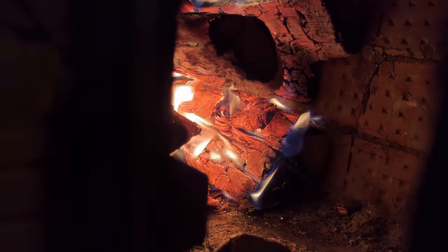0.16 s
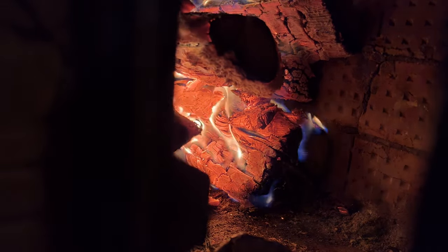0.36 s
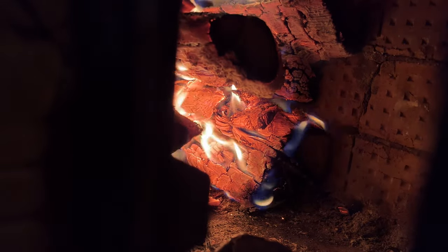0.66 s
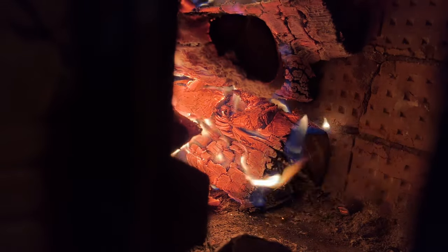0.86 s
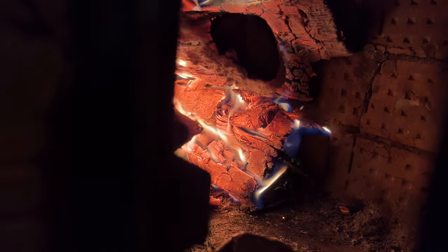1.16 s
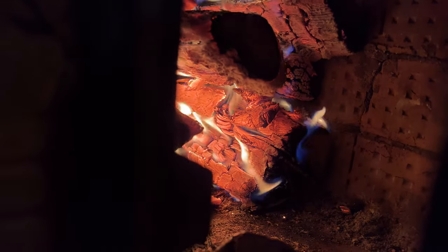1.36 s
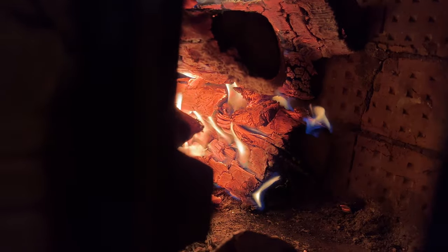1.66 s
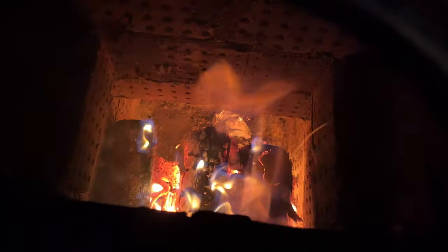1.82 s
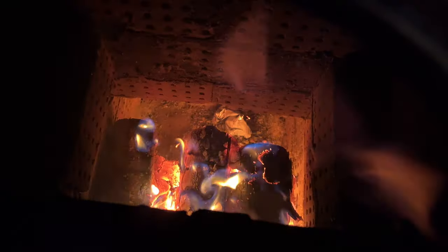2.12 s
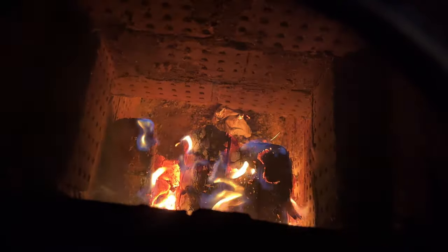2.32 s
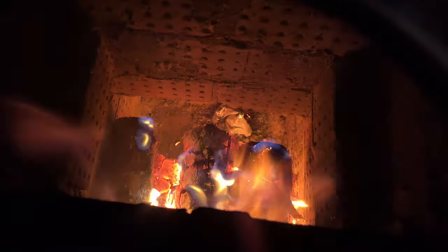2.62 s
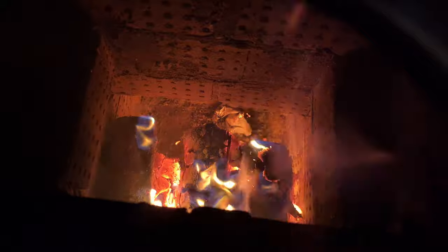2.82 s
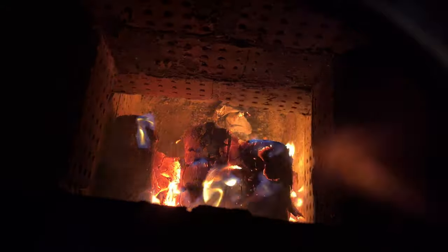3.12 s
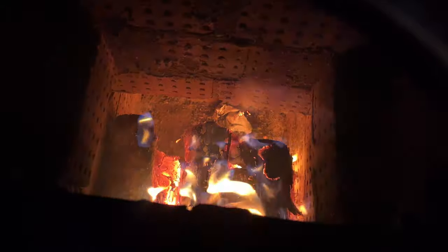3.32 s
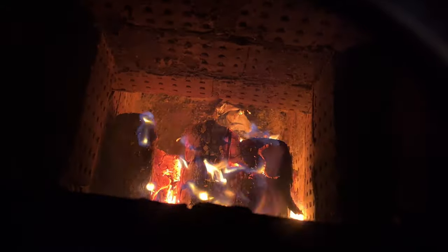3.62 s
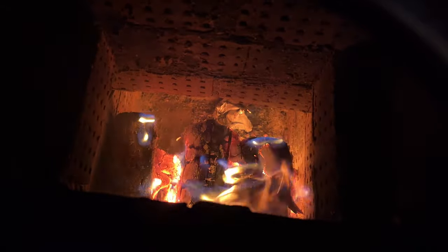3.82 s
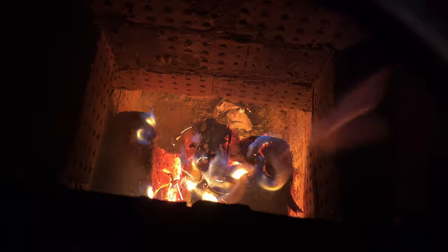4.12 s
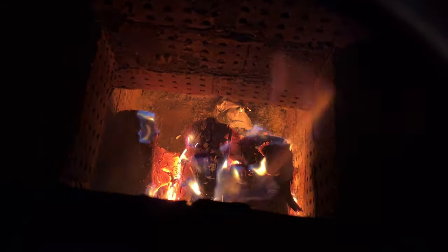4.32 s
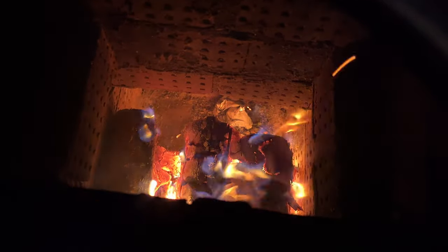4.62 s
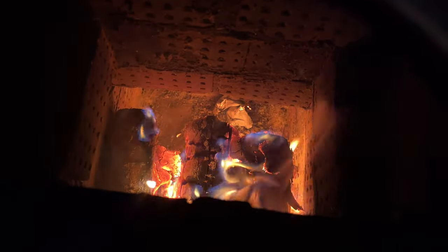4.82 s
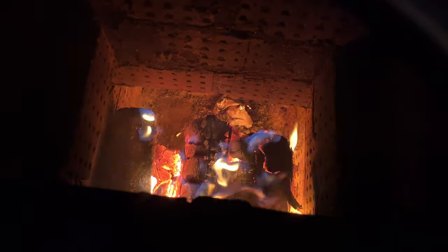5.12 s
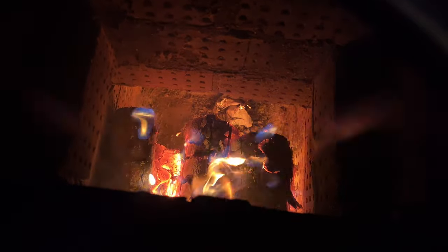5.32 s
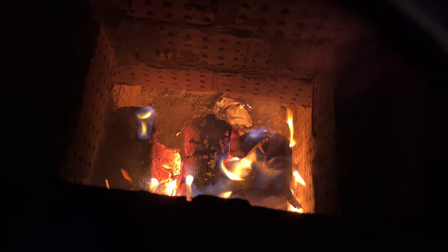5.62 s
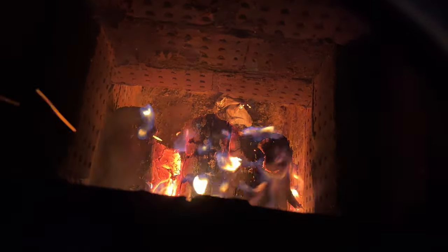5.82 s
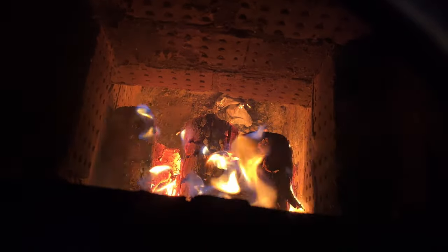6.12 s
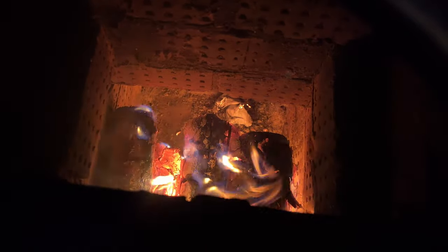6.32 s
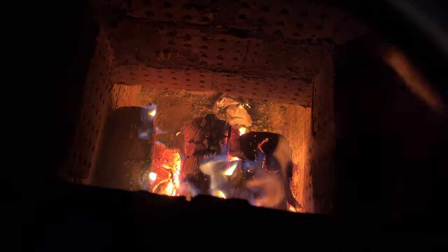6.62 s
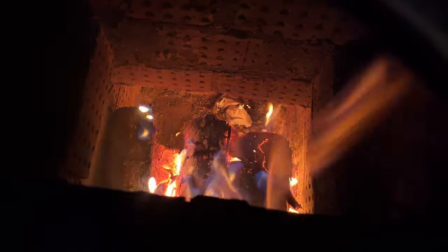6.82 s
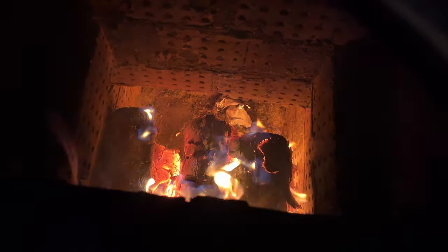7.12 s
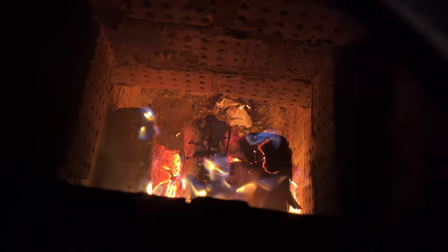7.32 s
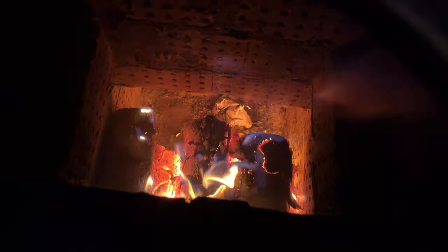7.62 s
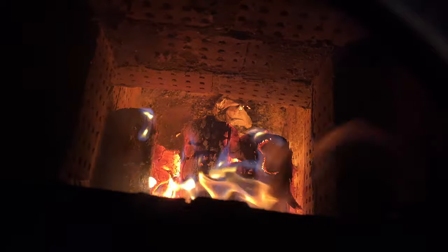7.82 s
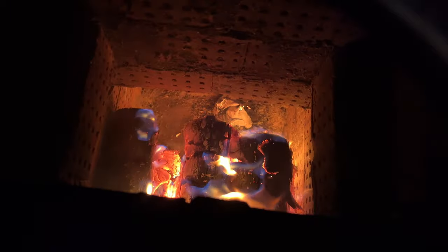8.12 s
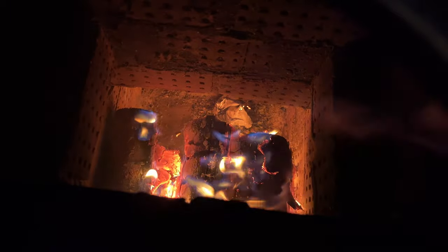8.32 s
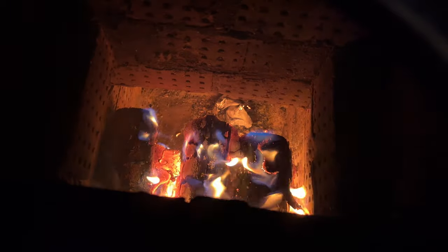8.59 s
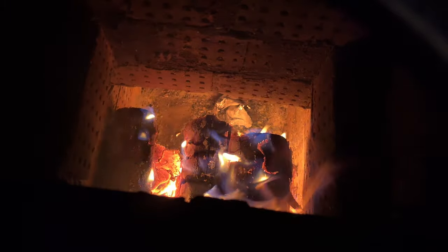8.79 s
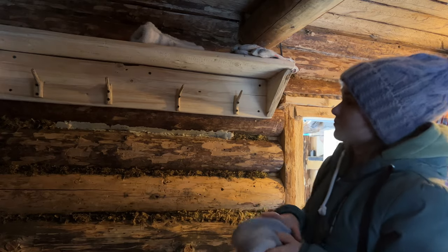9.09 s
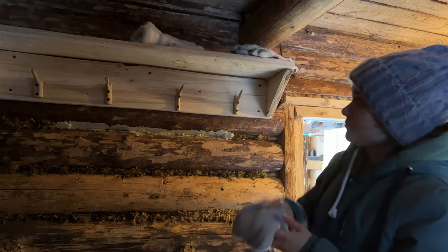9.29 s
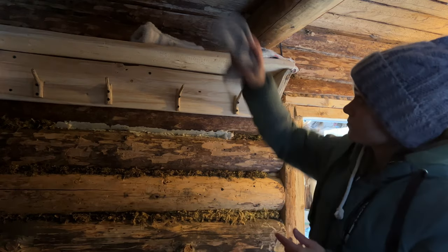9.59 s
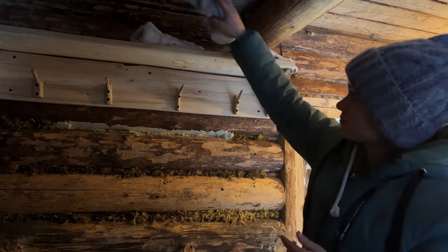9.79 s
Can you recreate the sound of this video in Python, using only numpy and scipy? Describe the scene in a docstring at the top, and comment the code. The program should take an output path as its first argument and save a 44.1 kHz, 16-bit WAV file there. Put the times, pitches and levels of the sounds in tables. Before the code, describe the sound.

A wood fire is heard very close, with dense dry crackling, fine sizzling and a low fluttering roar. After about two seconds the microphone is at the stove mouth, where flames puff deeper and louder, ticks are lighter, and occasional knocking pops punch through. At the end the fire vanishes into a hushed wooden room with one low thud and a sleeve swishing as an arm reaches up.

```python
"""An open brick stove, the microphone close to the embers, then at the stove mouth; last, a quiet log cabin.
At the stove, shaped noise makes flames that roar and flutter and sap that sizzles; pulses and damped
sines make wood that ticks, cracks and pops; fizzing noise jets out and the flue swells once.
In the cabin, cloth noise rustles as a jacketed arm reaches up to a shelf, and one dull knock rings
the timber as damped sines over a noise scuff and thud."""
import sys
import numpy as np
from scipy import signal
from scipy.fft import rfft, irfft, next_fast_len
from scipy.io import wavfile
from scipy.ndimage import uniform_filter1d, map_coordinates

SR = 44100
rng = np.random.default_rng(int(sys.argv[2]) if len(sys.argv) > 2 else 0)


def master_out(mix):
    """Clip the mix to full scale and print it as 16-bit PCM to the path in sys.argv[1]."""
    frames = np.transpose(np.atleast_2d(mix))
    ceiling = np.clip(frames, -1, 1)
    pcm = np.round(ceiling * 32767).astype(np.int16)
    wavfile.write(sys.argv[1], SR, pcm)


N = 438794

# steady burn under the puffs, starved for a while after the deepest pop: t/s, rumble level/dB, flutter level/dB
DRAUGHT = [(0.0, -24.5, -41), (0.6, -24.5, -38.5), (1.0, -28, -41.5), (1.85, -26, -40), (2.4, -24, -43.5),
           (3.9, -26.5, -39.5), (4.08, -31.5, -49), (4.55, -25.5, -41), (4.88, -31, -36), (5.42, -28, -49),
           (5.8, -23, -39.5), (6.68, -27.5, -46), (7.2, -24.5, -40.5), (8.2, -27.5, -43),
           (8.86, -24, -44.5)]
# tongues of flame flaring up: t/s, rumble level/dB
PUFFS = [(0.5, -19), (0.78, -23), (1.11, -21), (1.43, -20), (1.92, -32), (2.02, -18), (2.298, -14),
         (2.528, -18), (2.641, -19), (2.818, -16.5), (3.038, -14), (3.13, -23.5), (3.23, -18), (3.369, -16),
         (3.609, -20), (3.74, -22), (3.94, -12.5), (4.582, -24.5), (5.041, -21.5), (5.132, -18.5),
         (5.38, -24), (5.709, -19), (5.851, -17), (6.192, -13), (6.431, -20.5), (6.53, -19), (6.892, -15),
         (6.99, -18.5), (7.25, -22.5), (7.412, -21), (7.521, -15.5), (7.69, -24), (7.851, -17), (7.97, -18),
         (8.062, -18.5), (8.37, -21), (8.489, -18), (8.628, -22.5), (8.841, -15)]
# spectrum of the firebox rumble: f/Hz, relative level/dB
RUMBLE_SPECTRUM = [(13, -34.5), (22, -29), (60, -4), (86, 1.5), (106, -4), (135, -17), (220, -29),
                   (290, -32), (480, -120)]
# spectrum of the flame flutter, close to the embers: f/Hz, relative level/dB
EMBER_FLUTTER_SPECTRUM = [(100, -37.5), (170, -8.5), (240, -8), (325, 5), (400, 0), (520, -8), (630, -8),
                          (730, -24), (900, -18), (1200, -40.5), (2600, -81.5)]
# the same from the stove mouth: f/Hz, relative level/dB
MOUTH_FLUTTER_SPECTRUM = [(100, -35.5), (170, 0.5), (245, -12.5), (315, 0), (400, -4), (470, -9.5),
                          (540, -18), (620, -30), (800, -41.5), (910, -32.5), (1050, -41.5), (1400, -41),
                          (2200, -54.5), (4000, -90)]
# sap boiling out of the logs: t/s, relative level/dB
SAP = [(0.0, -54.5), (0.9, -55), (1.35, -55.5), (1.85, -56), (1.95, -74), (3.1, -67), (3.9, -65.5),
       (4.3, -74.5), (4.83, -65), (5.25, -71), (7.0, -67), (8.25, -73), (8.85, -65)]
# spectrum of the sizzle: f/Hz, relative level/dB
SIZZLE_SPECTRUM = [(400, -21.5), (650, 9.5), (1000, -1), (1800, -3), (3000, -3), (5500, -3.5), (6600, -4),
                   (7500, -1), (11000, 2.5), (12800, -14), (15000, 6), (16500, -9)]
# wood splitting, thin splits bright and deep ones dull: t/s, splinter level/dB, brightness/dB, splinter f/Hz
CRACKS = [(0.087, -37.5, 7, 3000), (0.173, -22.5, 1.5, 3120), (0.1964, -38, 3, 5500),
          (0.2468, -39, 1, 3300), (0.313, -42, 17.5, 4150), (0.3477, -29, 5.5, 3940),
          (0.4068, -31.5, -6.5, 2720), (0.5885, -49.5, 13.5, 4600), (0.6129, -35, -3, 3180),
          (0.7392, -32, -11, 2970), (0.7616, -40, 12.5, 4800), (0.8771, -32, -18.5, 4050),
          (0.912, -19, 2.5, 1990), (0.9633, -26, 3.5, 4200), (0.9784, -25, -3, 2860),
          (0.9849, -27.5, -0.5, 3760), (1.0916, -21, -3, 2610), (1.1692, -36, -6.5, 4300),
          (1.1997, -37, -2, 3360), (1.354, -41, 5.5, 4930), (1.3886, -37, 7.5, 4200),
          (1.412, -34, -12.5, 2460), (1.5854, -30, -5, 2940), (1.612, -35, 4.5, 5400),
          (1.6276, -17, -1.5, 4700), (1.656, -31.5, -3.5, 2600), (1.791, -16.5, -6, 4300),
          (1.9265, -39, 7, 5530), (1.9838, -37.5, 4, 3070), (2.038, -31.5, -1.5, 3300),
          (2.2517, -58.5, 19.5, 5500), (2.4943, -37.5, 8.5, 4950), (2.631, -53.5, 1, 1850),
          (2.7292, -42.5, 6.5, 3530), (2.8786, -52.5, -3.5, 3120), (3.0031, -34.5, 9, 5500),
          (3.2185, -46, 6.5, 4500), (3.4101, -41.5, 9.5, 5500), (3.5452, -49.5, 5.5, 4930),
          (3.7459, -29, 11.5, 5230), (3.833, -48.5, -0.5, 5270), (3.9145, -25, 7, 5420),
          (4.2002, -53.5, 4, 2300), (4.303, -45, 4.5, 5430), (4.7177, -43.5, -5.5, 1820),
          (4.8205, -40, 4.5, 5150), (4.8968, -49, 9.5, 3340), (4.978, -26, 0.5, 3880),
          (5.2741, -20, -1.5, 3370), (5.4923, -52, -4.5, 1900), (5.5721, -24, 5, 5600),
          (5.9316, -54.5, 13.5, 4830), (6.2458, -43.5, -1.5, 1970), (6.3307, -61.5, 18, 5130),
          (6.7343, -50.5, 9.5, 3550), (6.7892, -42, 0.5, 3330), (6.93, -46.5, 12, 3300),
          (6.9338, -36, 0, 3330), (7.0323, -49, -10, 1990), (7.126, -44, 2, 3350), (7.1934, -46, 3.5, 3270),
          (7.2558, -50, -1, 3100), (7.29, -50.5, 11, 5470), (7.3147, -43, 9.5, 5700),
          (7.4196, -50, 2.5, 3140), (7.713, -44.5, 6.5, 5400), (7.734, -44, 3, 3600),
          (7.7523, -43.5, 10.5, 5650), (7.885, -46, 4.5, 1900), (8.0145, -37.5, 6, 3450),
          (8.14, -43, 4.5, 3700), (8.4323, -42.5, 6.5, 3340), (8.813, -32, 1.5, 2970)]
# firebox modes ringing after a split: f/Hz, level over the log/dB, t60/s
FIREBOX_MODES = [(900, -16, .09), (1107, -25, 0.099), (1370, -13, 0.062), (2170, -17, .08),
                 (2880, -21, .08), (4700, -23.5, .08)]
# decay of the echo off the bricks: f/Hz, t60/s
BRICK_DECAY = [(500, 0.13), (3000, 0.13), (7000, 0.12), (14000, 0.082)]
# colour of the splits at the microphone: f/Hz, gain/dB
SNAP_COLOUR = [(4200, -0.5), (5300, -3.5), (6500, -0.5), (8000, 2.5), (11000, 1), (12900, -9), (15000, 3),
               (16300, 5)]
# heavy pops and gas pockets catching: t/s, knock relative level/dB, knock f/Hz, overtone f/Hz,
# boom level/dB, boom f/Hz
THUMPS = [(.877, -14.5, 730, 1150, -23, 88), (1.414, -12.5, 522, 900, -40, 89),
          (1.792, -17.5, 650, 987, -35, 91), (3.004, -11, 341, 985, -29, 96),
          (3.913, -6, 377, 720, -2.5, 57), (3.981, -16, 241, 551, -47, 82),
          (4.978, -16.5, 426, 1380, -27.5, 86), (5.2737, 0.5, 403, 1220, -9.5, 99),
          (5.571, -9, 397, 1370, -55.5, 89), (6.178, -37.5, 343, 900, -22, 96),
          (8.813, -20, 318, 640, -9, 88)]
# pockets of sap venting: t/s, length/s, level/dB, centre f/Hz
JETS = [(3.007, .12, -53, 9500), (3.007, 0.35, -61.5, 5040), (3.902, 0.077, -39.5, 5040),
        (7.692, 0.44, -59, 1380), (7.697, 0.53, -61.5, 6000)]
# lean of the stove sound, left minus right: f/Hz, level/dB
STOVE_TILT = [(60, 0), (350, 0), (700, 3), (1250, 7.5), (2000, 0), (3400, 3), (5500, 1.5), (8000, -.5)]
# lead of the left microphone port over the right at the stove: f/Hz, phase/rad
STOVE_LEAD = [(300, 0), (950, 0.57), (1900, 1.45), (2900, 1.13), (3500, 0.86), (4700, 0.9), (5700, -1.5),
              (8100, -7), (10000, -6), (11900, -8.5), (13650, -14), (15200, -9.5)]
# left-right likeness of the stove noises: f/Hz, coherence
STOVE_ALIKE = [(100, .99), (350, 0.88), (800, 0.67), (3000, 0.18), (9000, 0.92)]
# strokes of a sleeve, with the scuff of the knock at 8.99 s:
# t of the peak/s, rise/s, fall/s, rub relative level/dB, swish relative level/dB
STROKES_AND_SCUFF = [(8.89, 0.071, 0.14, -39, -46), (8.99, 0.013, 0.043, -25, -42),
                     (9.195, 0.084, 0.13, -33.5, -34.5), (9.55, 0.32, 0.21, -35, -38.5)]
# folds and fittings of the jacket flicking: t/s, starting level/dB, centre f/Hz
FLICKS = [(9.164, -29, 1560), (9.164, -31, 5700), (9.348, -32.5, 10000), (9.532, -29, 1380),
          (9.532, -29.5, 7000), (9.573, -22.5, 7760), (9.656, -43, 5700), (9.753, -43, 9100)]
# spectrum of the low rub: f/Hz, relative level/dB
RUB_SPECTRUM = [(76, -43), (130, -3), (330, -4.5), (392, 2.5), (427, -0.5), (493, -2), (676, -2.5),
                (1640, -5), (2190, -7), (4000, -12.5), (5200, -26), (8800, -120)]
# spectrum of the bright swish: f/Hz, relative level/dB
SWISH_SPECTRUM = [(1760, -44), (3000, -3.5), (5620, 2), (6810, -5), (8680, 0.5), (11300, -4.5),
                  (12300, -36), (15100, -2), (16200, -20), (16500, -39)]
# spectrum of the blow's grit: f/Hz, relative level/dB
KNOCK_SPECTRUM = [(180, -34), (300, 4), (441, -8), (769, -31), (940, 1), (1430, -5), (1800, -27),
                  (3490, -1.5), (7210, -29), (10300, -19), (12000, -46), (15600, -76), (22000, -120)]
# spectrum of the room's thud: f/Hz, relative level/dB
THUD_SPECTRUM = [(80, -18), (130, 10), (240, -5), (400, -4.5), (700, -16.0), (2000, -72)]
# modes of the knocked timber: f/Hz, level/dB, t60/s
TIMBER_MODES = [(67, -25, 0.5), (97, -9.5, 0.13), (151, -24, 0.1), (328, -42, 0.046)]
# spectrum of the cabin's room tone: f/Hz, relative level/dB
CABIN_SPECTRUM = [(13, -42), (22, -12), (64, 8.5), (253, -19.5), (338, -10), (395, -30), (433, -16),
                  (500, -23), (650, -36), (1100, -120)]
# lean of the cabin sound, left minus right: f/Hz, level/dB
CABIN_TILT = [(100, -4), (1300, -2.5), (2400, 0), (4400, 5), (8000, 0)]
# left-right likeness of the cabin noises: f/Hz, coherence
CABIN_ALIKE = [(60, 1), (200, .7), (700, 0.34), (3000, 0.81), (9000, .05)]

# changes of place (s), and the upper band limit
EMBERS_END, MOUTH_START, CABIN_START = 1.853, 1.869, 8.869
TOP_HZ = 16300
# a puff is 20 dB down this long before and after its peak; its flutter comes just ahead of its rumble
PUFF_RISE_S, PUFF_FALL_S, FLUTTER_LEAD_S = 0.047, 0.065, 0.009
# flutter of a puff relative to its rumble, and of a heavy pop relative to its tabled knock level
PUFF_FLUTTER_DB, POP_FLUTTER_DB, POP_FALL_S = -17.5, -18.5, 0.042
# flutter around this pitch gains so many dB per dB of strength over the usual level
FLUTTER_UPPER_HZ, FLUTTER_BRIGHTENS, USUAL_FLUTTER_DB = 526, 0.46, -39.5
# unevenness of boiling and flutter, dB per unit of a random curve
SAP_WAVER_DB, FLUTTER_WAVER_DB = 2.4, 1.8
# extra level of the log's band near the embers and at the mouth
EMBER_LOG_DB, MOUTH_LOG_DB = -10.5, -1.5
# light splits: mean number a second, level over the tabled sap, scatter either way, mean brightness
LIGHT_PER_S, LIGHT_OVER_SAP_DB, LIGHT_SPREAD_DB, LIGHT_BRIGHT_DB = 11, 6, 5.5, 7.5
# side modes of a splinter, different in each split: level, lowest pitch, range, decay
SIDE_MODES_DB, SIDE_MODES_HZ, SIDE_MODES_OCTAVES, SIDE_MODES_T60_S = -20, 1503, 2.9, 0.02
# the cloth never lies quite still: relative levels at rest
REST_RUB_DB, REST_SWISH_DB = -48, -55.5
# the left port hears the cabin this much later
CABIN_LAG_MS = 0.05


def amp(db):
    """Decibels to gain."""
    return 10 ** (np.asarray(db) / 20)


def unit(x):
    """Scale to rms 1."""
    return x / np.sqrt(np.mean(x ** 2) + 1e-20)


def clock(size=N):
    """Sample times in seconds."""
    return np.arange(size) / SR


def decay(t, t60):
    """Exponential decay that falls 60 dB in t60 seconds."""
    return np.exp(-np.log(1000) * t / t60)


def along(points, hz):
    """Read (Hz, value) points on a log frequency axis."""
    f, v = np.transpose(points)
    return np.interp(np.log(hz + 1), np.log(f + 1), v)


def curves(rows):
    """One value per sample for each column after the time."""
    s, *cols = np.transpose(rows)
    return [np.interp(clock(), s, c) for c in cols]


def filtered(x, response):
    """Filter x by a complex response of frequency."""
    size = x.shape[-1]
    padded = next_fast_len(size + 8192)
    spectrum = rfft(x, padded) * response(np.fft.rfftfreq(padded, 1 / SR))
    return irfft(spectrum, padded)[..., :size]


def band(x, lo_hz, hi_hz):
    """Causal band-pass."""
    edges = [lo_hz, min(hi_hz, SR / 2 - 1)]
    return signal.sosfilt(signal.butter(3, edges, "band", fs=SR, output="sos"), x)


def add(track, s, sound):
    """Mix a sound into a track at time s."""
    start = max(round(s * SR), 0)
    part = track[..., start:][..., :sound.shape[-1]]
    part += sound[..., :part.shape[-1]]


def wobble(rate):
    """A smooth random curve, rate knots a second."""
    knots = rng.standard_normal(int(N * rate / SR) + 4)
    return map_coordinates(knots, [np.arange(N) * rate / SR])


def noise(size=N):
    """Two unrelated white noises."""
    return rng.standard_normal((2, size))


def stereo(pair, spectrum, alike):
    """Colour two unrelated signals and blend them to left and right with a given coherence, rms 1."""
    def response(hz):
        turn = np.arccos(np.clip(along(alike, hz), -1, 1)) / 2
        return amp(along(spectrum, hz)) * [np.cos(turn), np.sin(turn)]

    mid, side = filtered(pair, response)
    return unit(np.array([mid + side, mid - side]))


def steady(x, span):
    """Even out swells slower than span seconds."""
    power = uniform_filter1d(np.mean(x ** 2, 0), int(span * SR))
    return x / np.sqrt(np.abs(power) + 1e-9)


def grains(rate, spread_db, t60):
    """Tiny noise bursts at random times, their sizes scattered exponentially in dB, rms 1."""
    starts = rng.random(N) < rate / SR
    sizes = starts * amp(spread_db * np.minimum(rng.exponential(size=N), 3))
    power = signal.fftconvolve(sizes ** 2, amp(-120 * clock(size=2048) / t60))[:N]
    return unit(np.sqrt(np.abs(power)) * noise())


def ring(t, hz, t60, attack):
    """A damped sine with a soft start."""
    return np.sin(2 * np.pi * hz * t) * decay(t, t60) * (1 - np.exp(-t / attack))


def placed(x, tilt, lead):
    """Lean to one side by frequency; the left port leads by lead(hz) radians."""
    sides = np.array([[.5], [-.5]])
    return filtered(x, lambda hz: amp(sides * along(tilt, hz)) * np.exp(1j * sides * lead(hz)))


def swell(s, rise, fall):
    """Start and power of a swell peaking at s, 20 dB down rise seconds before and fall seconds after."""
    t = np.arange(-2 * rise, 2 * fall, 1 / SR)
    return s + t[0], amp(-40 * np.abs(t / np.where(t < 0, rise, fall)) ** 1.5)


def swelling(base_db, swells):
    """Gain of a base level with (s, rise s, fall s, dB) swells added in power."""
    power = amp(base_db) ** 2 * np.ones(N)
    for s, rise, fall, db in swells:
        start, shape = swell(s, rise, fall)
        add(power, start, amp(db) ** 2 * shape)
    return np.sqrt(power)


def roar():
    """Flames pump the firebox's low resonance and flutter in its higher modes, brighter when strong."""
    rumble_db, flutter_db = curves(DRAUGHT)
    flares = [(s, PUFF_RISE_S, PUFF_FALL_S, db) for s, db in PUFFS]
    flaps = [(s - FLUTTER_LEAD_S, PUFF_RISE_S, PUFF_FALL_S, db + PUFF_FLUTTER_DB) for s, db in PUFFS]
    # heavy pops jolt the flames too
    jolts = [(s + 0.0046, .012, POP_FALL_S, knock_db + POP_FLUTTER_DB) for s, knock_db, *_ in THUMPS]

    rumble = steady(stereo(noise(), RUMBLE_SPECTRUM, STOVE_ALIKE), span=0.087)
    puffs = grains(rate=70, spread_db=2.5, t60=0.027) + amp(-3) * noise()
    near = stereo(puffs, EMBER_FLUTTER_SPECTRUM, STOVE_ALIKE)
    mouth = stereo(puffs, MOUTH_FLUTTER_SPECTRUM, STOVE_ALIKE)
    flutter = steady(np.where(clock() < EMBERS_END, near, mouth), span=0.11)
    upper = filtered(flutter, lambda hz: 1 / (1 + ((hz - FLUTTER_UPPER_HZ) / 110) ** 4))

    flicker = wobble(14)
    rumble_gain = swelling(rumble_db + 1.3 * flicker, flares)
    strength = swelling(flutter_db + FLUTTER_WAVER_DB * flicker, flaps + jolts)
    bright = np.minimum((strength / amp(USUAL_FLUTTER_DB)) ** FLUTTER_BRIGHTENS, 1.6)
    return rumble_gain * rumble + strength * (flutter + (bright - 1) * upper)


def sizzle():
    """Sap boils in a fine hiss; tiny ticks of charring wood stand out of it."""
    sap_db, = curves(SAP)
    hiss = noise() + amp(-12) * grains(rate=320, spread_db=7.5, t60=.002)
    hiss = stereo(hiss, SIZZLE_SPECTRUM, STOVE_ALIKE)
    ticks = stereo(grains(rate=50, spread_db=6, t60=.012), SIZZLE_SPECTRUM, STOVE_ALIKE)
    hiss_gain = amp(sap_db + 3.5 + SAP_WAVER_DB * wobble(21))
    return hiss_gain * hiss + amp(-8.5 + 0.83 * sap_db) * ticks


def light_splits():
    """Random rows like those of CRACKS for the light splits, stronger where more sap boils."""
    rows = rng.random((int(LIGHT_PER_S * CABIN_START), 4))
    s = CABIN_START * rows[:, 0]
    sap_db = np.interp(s, *np.transpose(SAP))
    db = sap_db + LIGHT_OVER_SAP_DB + LIGHT_SPREAD_DB * (2 * rows[:, 1] - 1)
    bright_db = LIGHT_BRIGHT_DB + 7 * (2 * rows[:, 2] - 1)
    return list(zip(s, db, bright_db, 2700 * 2 ** rows[:, 3]))


def brick_echo():
    """A new diffuse firebox tail, about energy 1 in each channel, decaying by frequency."""
    hz, t, z = signal.stft(noise(size=6144), SR, nperseg=128)
    tail = signal.istft(z * decay(t, along(BRICK_DECAY, hz)[:, None]), SR, nperseg=128)[1]
    return unit(tail) / np.sqrt(tail.shape[1])


def cracks():
    """A split is a sharp pulse, a ragged scatter among the logs, a brief ring of wood and a brick echo."""
    out, t = np.zeros((2, N)), clock(size=6144)
    for s, splinter_db, bright_db, splinter_hz in CRACKS + light_splits():
        near = s < EMBERS_END
        # brightness lifts the snap and lowers the log by as much
        snap_db = splinter_db + bright_db
        log_db = splinter_db - bright_db + (EMBER_LOG_DB if near else MOUTH_LOG_DB)
        ragged = amp(3.43 * unit(uniform_filter1d(rng.standard_normal(len(t)), size=90)))
        scatter = (rng.standard_normal(len(t)) + .5 * noise(size=len(t))) * ragged

        # the splinter rings at its own pitch and stirs a lower mode of the log
        splinter = ring(t, splinter_hz, t60=.007, attack=.0001)
        log = ring(t, 1000 * np.exp(.2 * rng.standard_normal()), t60=0.024, attack=.0002)
        side_hz = SIDE_MODES_HZ * 2 ** (SIDE_MODES_OCTAVES * rng.random(size=6))
        side_modes = sum(ring(t, hz, SIDE_MODES_T60_S, attack=0.00051) for hz in side_hz)
        pulse = (t == 0) + amp(-10) * splinter + amp(SIDE_MODES_DB) * side_modes + amp(-22) * log

        # close to the embers the echo is weaker and dies sooner
        echo = brick_echo() * ragged * (amp(-2.5 - 190 * t) if near else amp(4.0))
        # the sharp snap beams straight out; the lower parts linger and fill the firebox
        parts = [(snap_db, 5800, 16000, .011, -12.5),
                 (splinter_db, 2200, 5700, .019, -2.5),
                 (log_db, 600, 1550, .024, -1.5)]
        for db, lo_hz, hi_hz, t60, echo_db in parts:
            spread = amp(6.5) * unit(scatter * decay(t, t60)) / np.sqrt(len(t))
            part = band(pulse + spread + amp(echo_db) * echo, lo_hz, hi_hz)
            opening = part[:, :SR // 200]  # 5 ms sets the level
            add(out, s, amp(db) * part / np.sqrt(np.mean(opening ** 2, 1, keepdims=True)))
        for hz, db, t60 in FIREBOX_MODES:
            gain = amp(log_db + db + rng.normal(0, 2.3))
            add(out, s, gain * ring(t, hz * rng.normal(1, 0.0072), t60, attack=0.0028))
    return filtered(out, lambda hz: amp(along(SNAP_COLOUR, hz)))


def thumps():
    """A heavy pop knocks the log, and a moment later the air in the firebox booms."""
    out, t = np.zeros(N), clock(size=SR // 2)
    for s, knock_db, knock_hz, overtone_hz, boom_db, boom_hz in THUMPS:
        log_knock = ring(t, knock_hz, t60=.032, attack=.0005)
        overtone = ring(t, overtone_hz, t60=0.033, attack=0.0019)
        boom = ring(t, boom_hz, t60=0.21, attack=0.0061)
        add(out, s, amp(knock_db - 3.5) * (log_knock + amp(-9) * overtone))
        add(out, s + .012, amp(boom_db) * boom)
    return out


def jets():
    """A jet of venting sap opens at once, fizzes in fine grains and runs dry."""
    out = np.zeros((2, N))
    bursts = grains(rate=900, spread_db=2, t60=.012)
    fizz = stereo(bursts, [(1000, 0)], STOVE_ALIKE)  # flat spectrum
    for s, length, db, hz in JETS:
        t = clock(size=int(length * SR))
        flow = (1 - np.exp(-t / 0.0071)) * np.sqrt(1 - t / length)
        stretch = fizz[:, int(s * SR):][:, :len(t)]
        add(out, s, amp(db) * flow * unit(band(stretch, 0.62 * hz, 1.54 * hz)))
    return out


def flue():
    """The air column of the flue answers the deepest pop with a slow swell at 47 Hz."""
    out, t = np.zeros(N), clock(size=SR // 4)
    add(out, 3.99, amp(-17.5) * np.hanning(len(t)) * np.sin(2 * np.pi * 47 * t))
    return out


def room_tone():
    """The quiet cabin as a steady, low coloured noise."""
    return amp(-42.5) * stereo(noise(), CABIN_SPECTRUM, CABIN_ALIKE)


def jacket():
    """Cloth rubs in fine grains, catching and slipping, and folds flick; the knock's scuff shares the noise."""
    rub_swells = [(s, rise, fall, db) for s, rise, fall, db, _ in STROKES_AND_SCUFF]
    swish_swells = [(s, rise, fall, db) for s, rise, fall, _, db in STROKES_AND_SCUFF]
    rub_gain = swelling(REST_RUB_DB, rub_swells)
    swish_gain = swelling(REST_SWISH_DB, swish_swells)
    catch = wobble(45)
    weave = noise() + amp(-6.5) * grains(rate=250, spread_db=-1.5, t60=0.018)
    rub = rub_gain * amp(-4.0 + 1.4 * catch) * stereo(weave, RUB_SPECTRUM, CABIN_ALIKE)
    threads = noise() + amp(-6) * grains(rate=400, spread_db=2, t60=.009)
    swish = swish_gain * amp(1.9 * catch) * stereo(threads, SWISH_SPECTRUM, CABIN_ALIKE)

    flicks, t = np.zeros((2, N)), clock(size=4096)
    for s, db, hz in FLICKS:
        flick = unit(band(noise(size=len(t)), 0.62 * hz, 1.2 * hz))
        add(flicks, s, amp(db) * flick * decay(t, 0.04))
    return rub + swish + flicks


def knock():
    """A gritty blow sets the cabin's timber ringing; the room answers with a short, diffuse thud."""
    out, t = np.zeros((2, N)), clock(size=SR // 2)
    grit = noise(size=len(t)) + amp(-0.5) * grains(rate=498, spread_db=1, t60=0.0063)[:, :len(t)]
    blow = stereo(grit, KNOCK_SPECTRUM, CABIN_ALIKE) * decay(t, 0.12)
    thud = stereo(noise(size=len(t)), THUD_SPECTRUM, CABIN_ALIKE) * decay(t, 0.4)
    timber = sum(amp(db) * ring(t, hz, t60, attack=0.0063) for hz, db, t60 in TIMBER_MODES)
    add(out, 8.985, amp(-23) * blow)
    add(out, 8.992, amp(-25.0) * thud)
    add(out, 8.997, timber)
    return out


def scene():
    """Two microphone places at the fire with a brief gap between them, then the cabin."""
    t = clock()
    fire = roar() + sizzle() + cracks() + thumps() + jets() + flue()
    fire = placed(fire, STOVE_TILT, lambda hz: along(STOVE_LEAD, hz))
    cabin = room_tone() + jacket() + knock()
    cabin = placed(cabin, CABIN_TILT, lambda hz: -2 * np.pi * hz * CABIN_LAG_MS / 1000)
    at_stove = (t < EMBERS_END) | ((t > MOUTH_START) & (t < CABIN_START))
    stove_gain = uniform_filter1d(at_stove * 1., size=64)  # softens the edges
    return fire * stove_gain + cabin * (t >= CABIN_START)


def record(dry):
    """Peaks clip at full scale; a steep low-pass then cuts what lies above the band limit."""
    return filtered(np.clip(dry, -1, 1), lambda hz: 1 / (1 + (hz / TOP_HZ) ** 120))


dry = scene()
out = record(dry)
master_out(out)
```